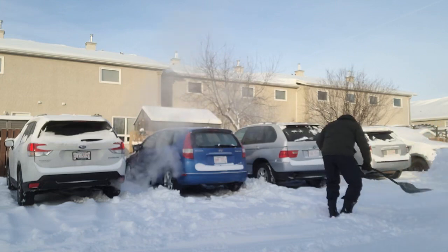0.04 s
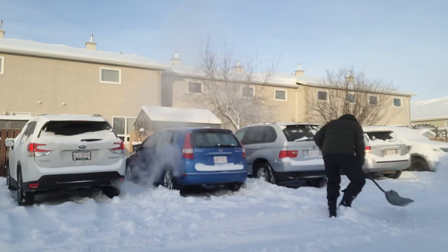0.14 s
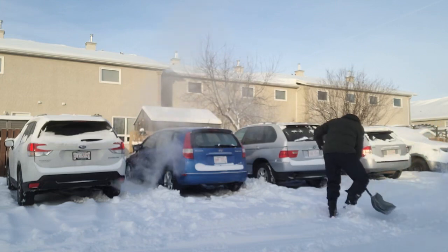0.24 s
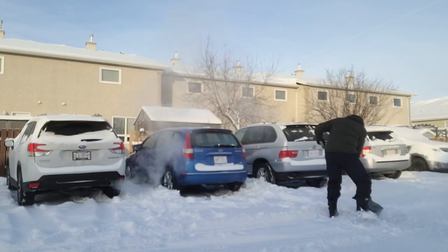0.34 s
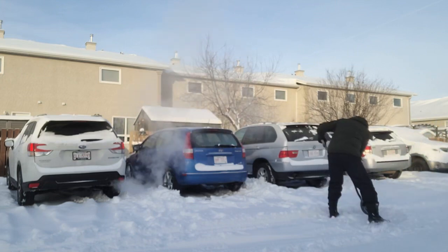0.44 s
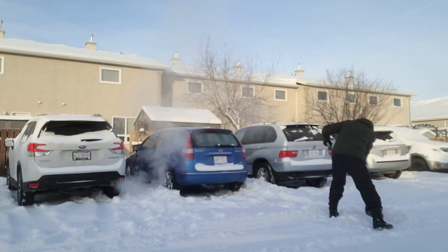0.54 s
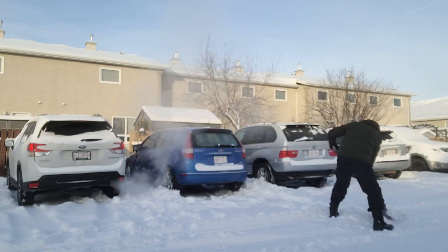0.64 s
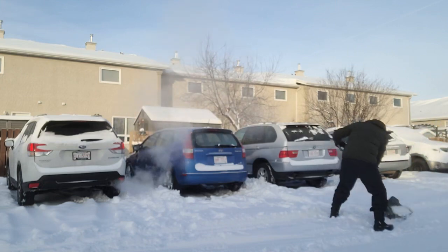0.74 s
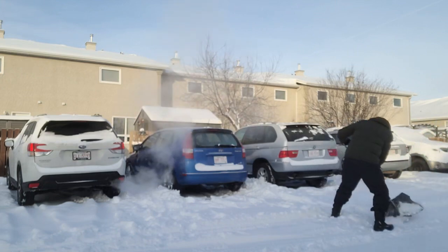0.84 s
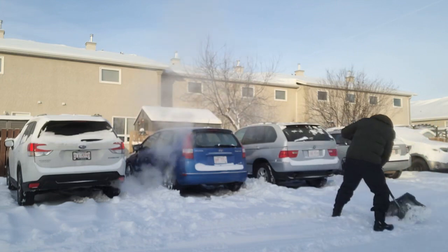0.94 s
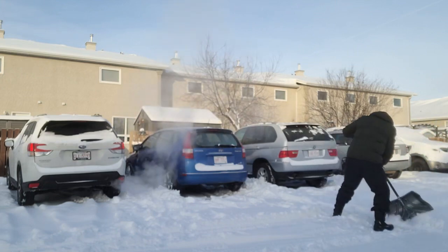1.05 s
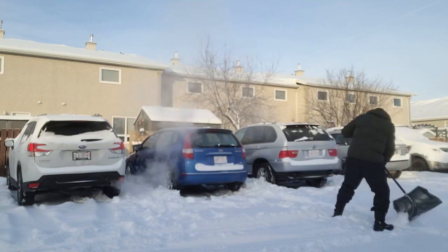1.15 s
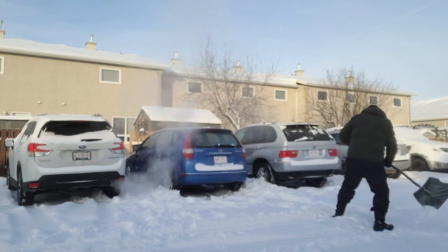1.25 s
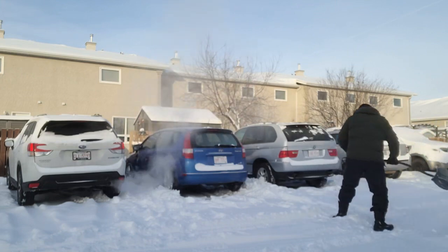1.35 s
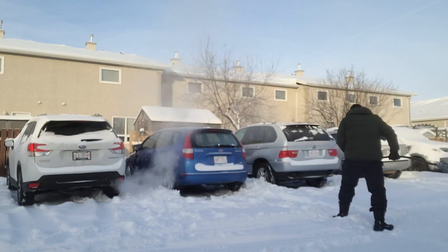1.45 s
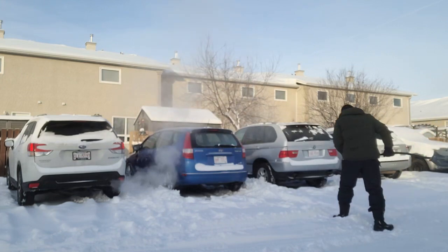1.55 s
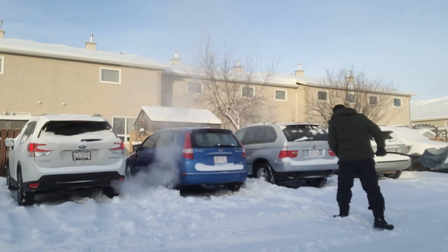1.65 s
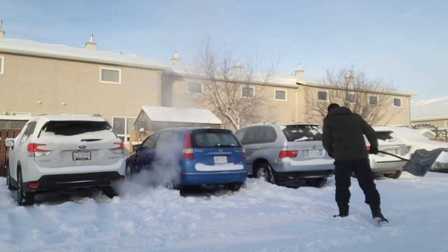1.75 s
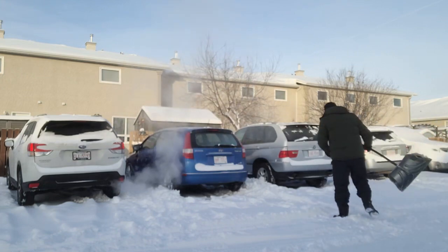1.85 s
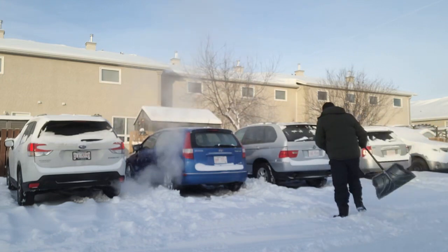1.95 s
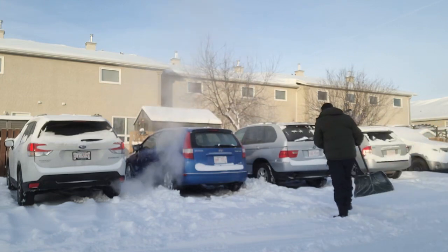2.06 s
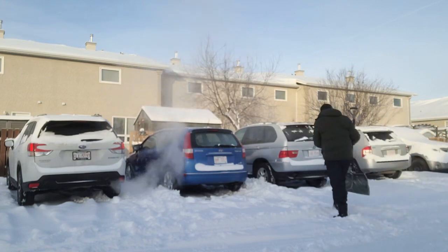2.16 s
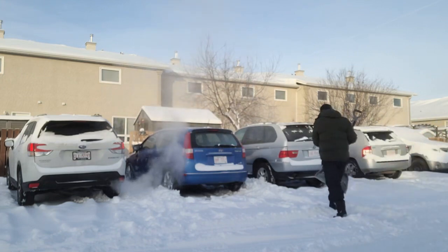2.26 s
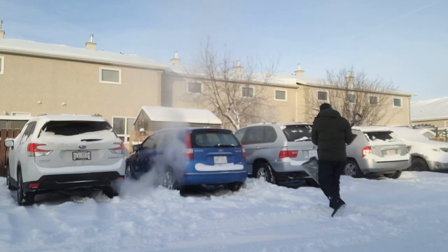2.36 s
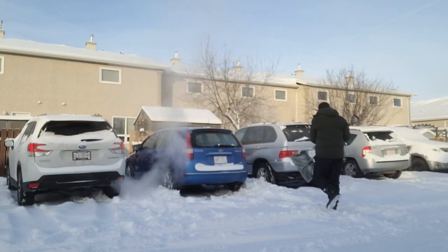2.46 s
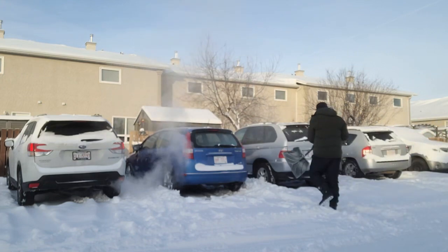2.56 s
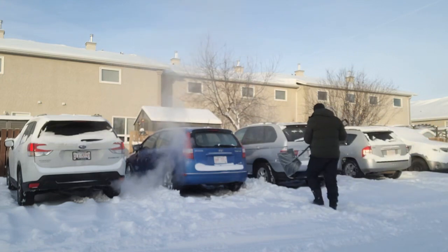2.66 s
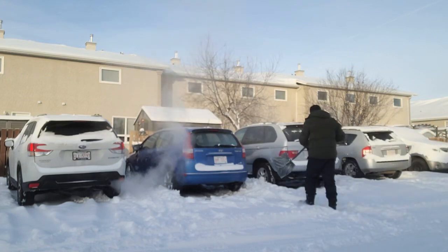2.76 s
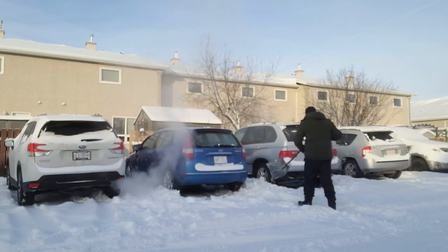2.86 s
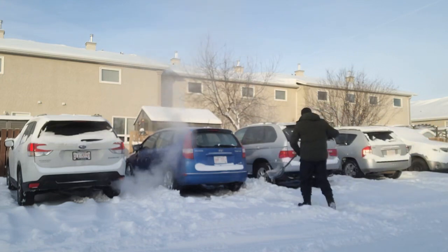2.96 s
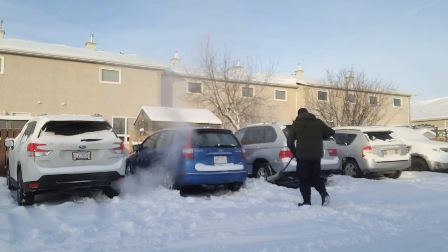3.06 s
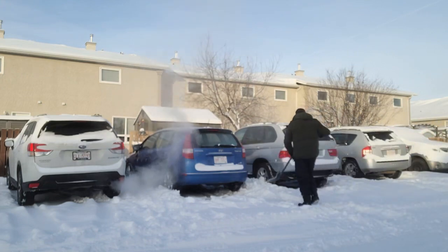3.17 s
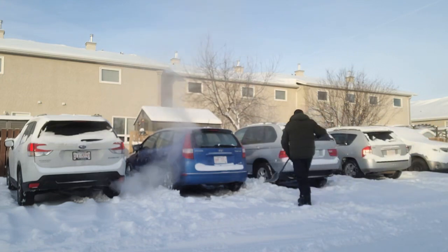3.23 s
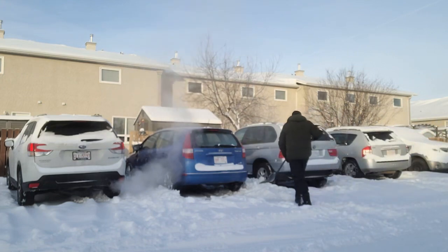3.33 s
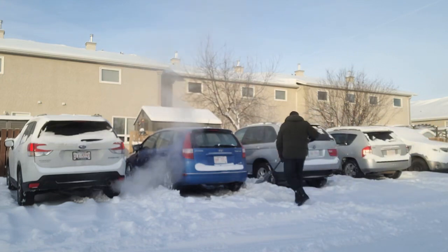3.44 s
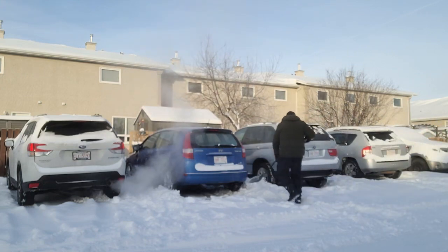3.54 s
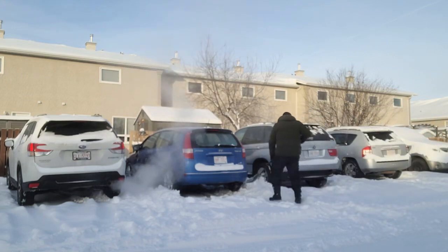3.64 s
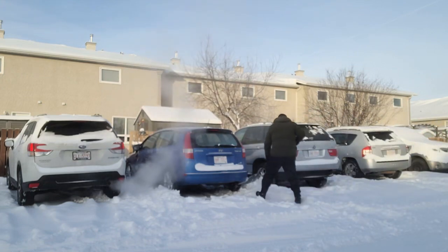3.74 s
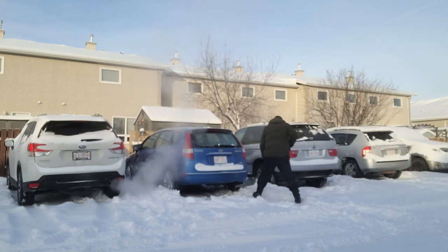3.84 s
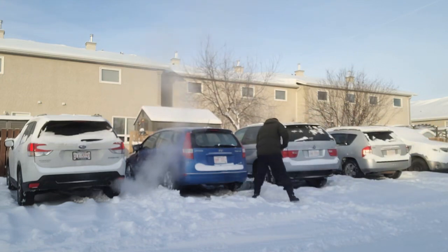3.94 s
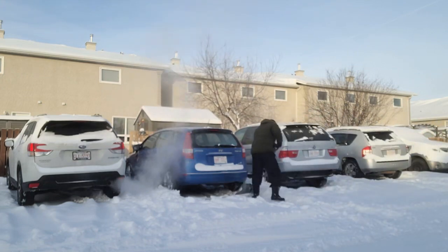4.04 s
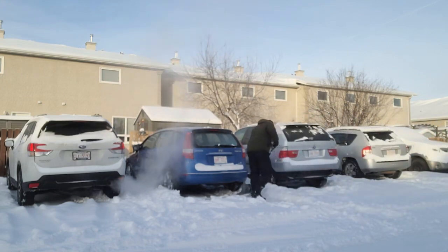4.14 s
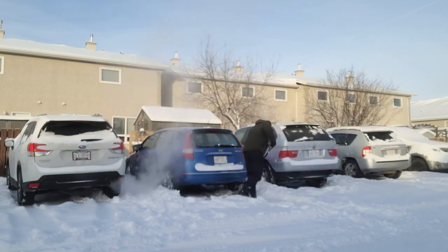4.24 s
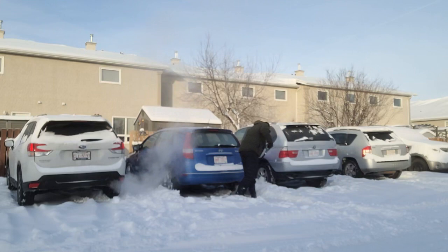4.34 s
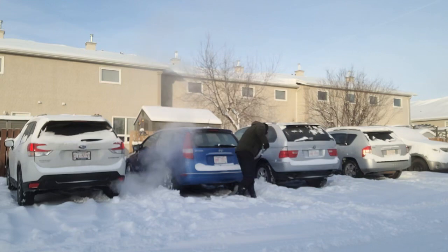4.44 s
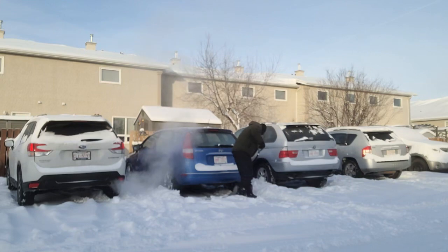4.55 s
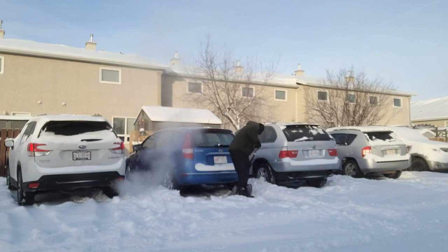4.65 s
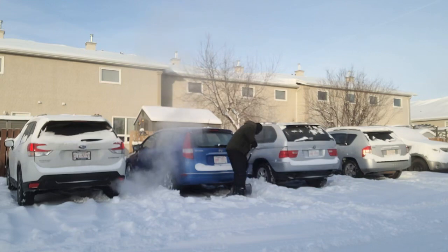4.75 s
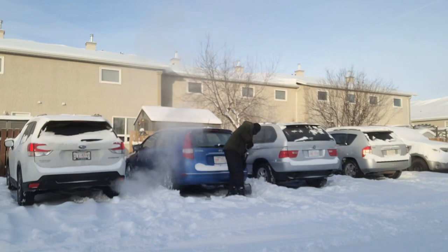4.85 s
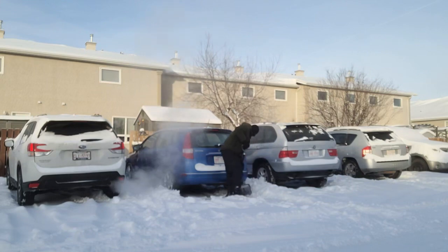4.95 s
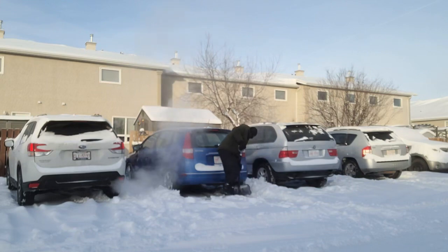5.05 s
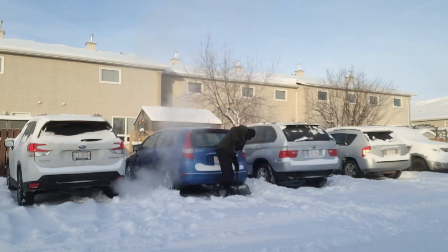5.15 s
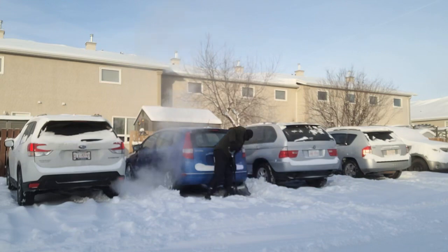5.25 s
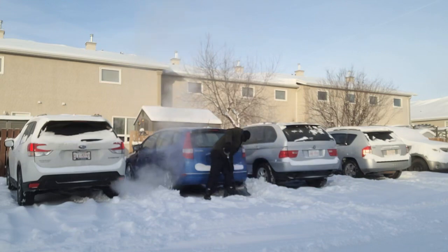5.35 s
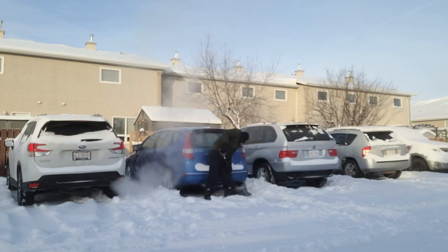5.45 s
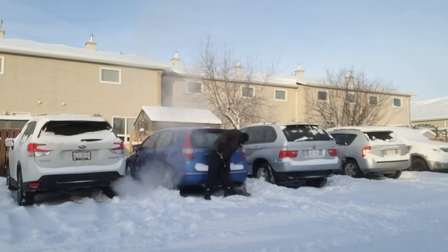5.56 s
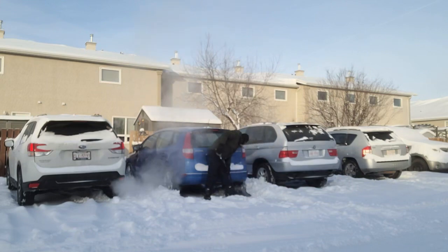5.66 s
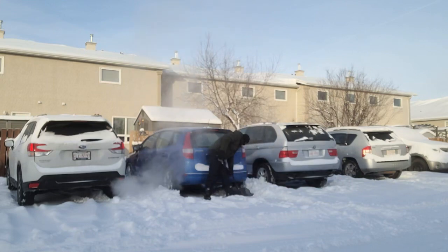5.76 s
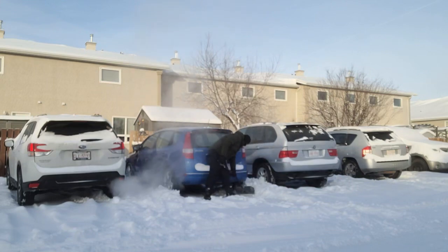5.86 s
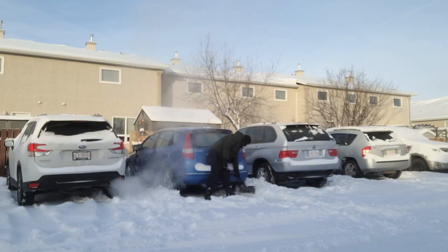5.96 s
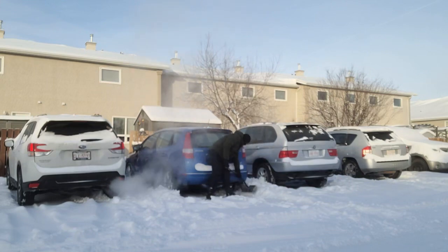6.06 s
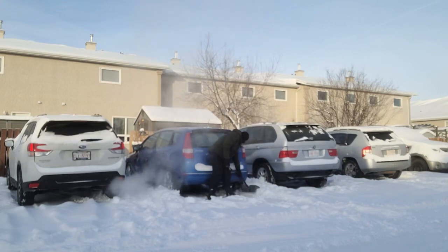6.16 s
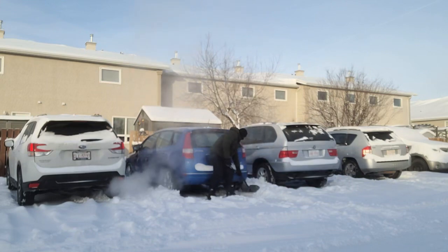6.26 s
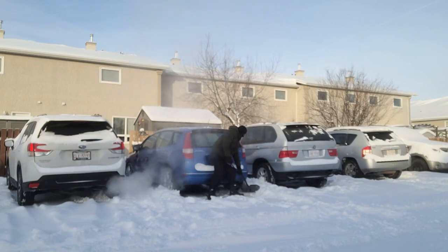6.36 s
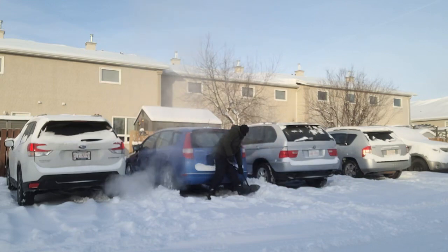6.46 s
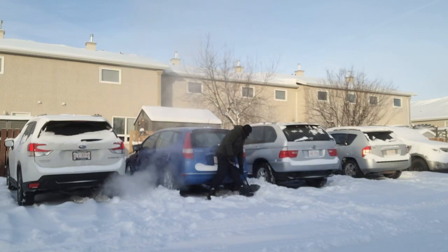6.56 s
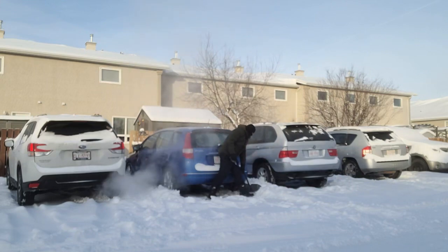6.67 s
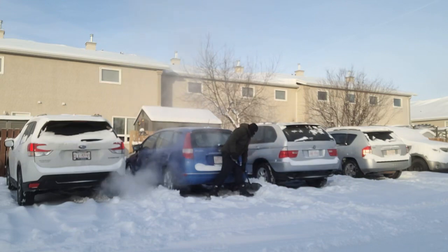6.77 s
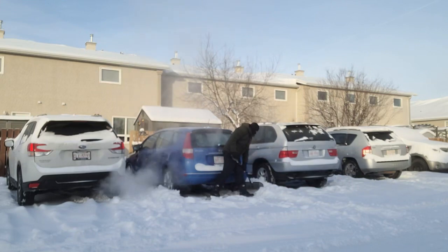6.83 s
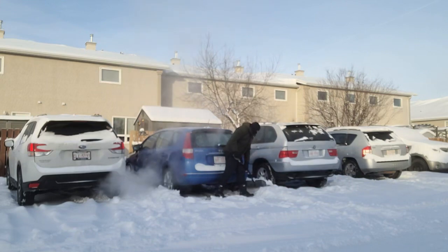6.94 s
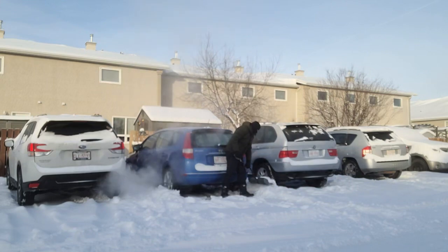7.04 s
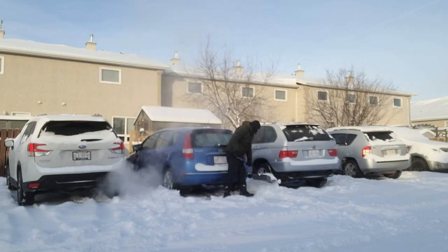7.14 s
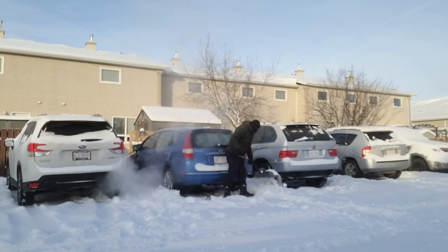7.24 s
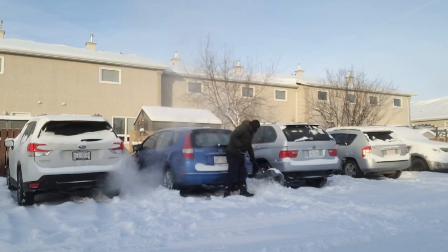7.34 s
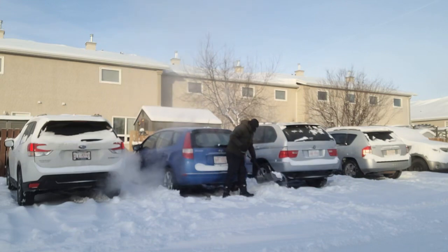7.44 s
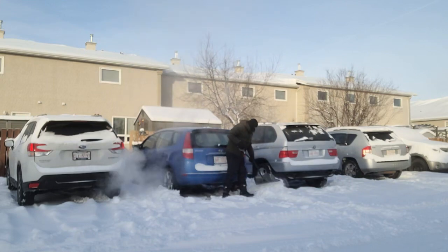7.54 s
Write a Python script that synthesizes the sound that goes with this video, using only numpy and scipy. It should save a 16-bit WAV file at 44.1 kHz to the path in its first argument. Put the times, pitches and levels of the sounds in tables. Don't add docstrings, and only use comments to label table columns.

```python
import sys
import numpy as np
from scipy import signal
from scipy.fft import rfft, irfft, next_fast_len
from scipy.io import wavfile
from scipy.ndimage import uniform_filter1d, map_coordinates

SR = 44100
rng = np.random.default_rng(int(sys.argv[2]) if len(sys.argv) > 2 else 0)


def gain_from_db(level_db):
    decades = np.asarray(level_db, float) / 20
    return 10 ** decades


def waveform_to_disk(signal):
    frames = np.transpose(np.atleast_2d(signal))
    scaled = np.clip(frames, -1, 1) * 32767
    samples = np.round(scaled).astype(np.int16)
    wavfile.write(sys.argv[1], SR, samples)


N = 335160

# (frequency [Hz], likeness [0 to 1])
SNOW_LIKENESS = [(130, .99), (300, .97), (700, .75), (2000, .72), (5000, .6), (15000, .3)]
# (frequency [Hz], left minus right [dB])
SNOW_TILT = [(60, -6), (180, -1), (550, -1), (1650, 2), (4970, 7), (15000, 9)]
# (time [s], lead [samples])
LEFT_LEAD = [
    (0, 9),
    (2, 9),
    (4, 1),
    (7.6, 1),
]


def shovel():
    near = friction() + singing() + thuds()
    echo = gain_from_db(-15) * yard(near)
    left, right = ports(near + echo, SNOW_LIKENESS, SNOW_TILT)
    lead = np.round(curves(LEFT_LEAD)[0]).astype(int)
    return np.array([left, right[np.maximum(np.arange(N) - lead, 0)]])


# (frequency [Hz], level per Hz [dB])
CRACKLE_TONE = [(1500, -18), (2600, -0.5), (3000, -1), (4400, -0.5), (6200, -1.5), (7600, 4), (8600, -15),
                (9500, -10.5)]
# (frequency [Hz], width [Hz], level [dB])
EDGE_MODES = [(2750, 250, -15), (3550, 44, 14.5), (3940, 1900, -0.5), (5210, 420, 12), (5780, 1200, 0),
              (7380, 38, -1)]
# (frequency [Hz], level per Hz [dB])
SHARD_TONE = [(300, -32), (700, 16), (1200, -14), (5000, 10), (8000, -2), (9000, -18), (12000, -20),
              (16000, -12)]
# (frequency [Hz], level per Hz [dB])
POWDER_TONE = [(6500, -29), (8200, -7.5), (9000, -10), (10500, -3), (12300, -0.5), (14000, -2), (15900, 3),
               (17000, 0)]
# (frequency [Hz], width [Hz], level [dB])
RASP_MODES = [(900, 114, 0), (1148, 104, 0.5), (1364, 110, 3), (1710, 500, 3.5), (2240, 1000, -1)]
# (frequency [Hz], width [Hz], level [dB])
EARLY_BOOM_MODES = [(181, 119, -6.5), (291, 66, -2.5), (412, 49, -8.5), (573, 84, -12.5), (712, 100, -17)]
# (frequency [Hz], width [Hz], level [dB])
LATE_BOOM_MODES = [(145, 29, -7), (250, 22, -3.5), (352, 55, -11.5), (439, 100, -14.5), (682, 72, -17.5)]


def friction():
    sliding, fine, scraping, load = motion()
    spray, crack, puff = breaks()
    spray = gain_from_db(-10) * spray

    stutter = gain_from_db(.8 * np.tanh(wobble(30)))
    clumps = gain_from_db(2.2 * np.tanh(wobble(250)))
    grains = stutter * clumps * patchy(patchy_db=1.5)

    crunch = shaped(grains, lambda hz: tone(CRACKLE_TONE)(hz) * (1 + resonances(EDGE_MODES)(hz)))
    crunch = crunch * (sliding + .5 * spray)
    shards = shaped(rng.standard_normal((2, N)), tone(SHARD_TONE))
    shards = gain_from_db(-2) * (spray + gain_from_db(-9.5) * crack) * shards
    powder = shaped(grains, tone(POWDER_TONE)) * (gain_from_db(5) * fine + gain_from_db(-10) * puff)
    rasp = shaped(grains, resonances(RASP_MODES)) * (scraping + gain_from_db(.5) * crack)

    push = stutter * gain_from_db(1.5 * np.tanh(wobble(45))) * rng.standard_normal((2, N))
    late = np.clip(np.arange(N) / SR - 3.5, 0, 1)
    early_boom = shaped(push, resonances(EARLY_BOOM_MODES))
    late_boom = shaped(push, resonances(LATE_BOOM_MODES))
    boom = (1 - late) * early_boom + late * late_boom
    return crunch + powder + rasp + shards + load * boom


# (time [s], sliding of the edge [dB], load on the blade over sliding [dB])
DEEP_STROKES = [
    [(0.59, -74, 12), (0.608, -66, 19), (0.626, -47.5, 11.5), (0.652, -42.5, 6.5), (0.67, -42, 5.5),
     (0.772, -43, 11), (0.956, -41, 7.5), (1.06, -47.5, 0.5)],
    [(1.06, -47, -3), (1.084, -45.5, -3.5), (1.112, -40.5, -4.5), (1.156, -41, 2.5), (1.182, -38, 5.5),
     (1.222, -72, -3), (1.25, -66, 12)],
    [(5.65, -71, 3), (5.664, -61, 9), (5.684, -44, -8), (5.716, -39.5, 1), (5.744, -59, 18),
     (5.75, -50, -6)],
    [(5.75, -48, 2), (5.786, -39.5, -5), (5.82, -40.5, 4.5), (5.896, -38.5, -1), (5.942, -46.5, -1.5),
     (5.954, -54, -5), (5.996, -51.5, -5), (6.13, -77.5, 1)],
]
# (time [s], sliding of the edge [dB], load on the blade over sliding [dB])
LIGHT_DRAGS = [
    [(4.86, -77, -6), (4.93, -60, -5), (4.96, -60.5, -6), (5.05, -50, -10), (5.14, -54.5, -6),
     (5.188, -51, -10), (5.23, -57, -6)],
    [(5.23, -54.5, -4), (5.264, -59.5, -6), (5.276, -53.5, -3), (5.378, -56.5, -4), (5.494, -51, -9),
     (5.556, -61.5, -2), (5.638, -66.5, -12), (5.65, -58, -6)],
]
# (fine powder thrown [dB], rasp in the blade [dB])
STROKE_TINTS = [
    (-5.5, -7),
    (-4.5, -1),
    (-8, -2.5),
    (-0.5, -2),
    (-5, 1.5),
    (-5.5, -0.5),
]
# (time of peak [s], rise [s], fall [s], level [dB], fineness [dB])
BOOT_TREADS = [(0, 0.0085, 0.0085, -53, -14.5), (.5, 0.75, 0.74, -66, 9), (1.33, 0.24, 0.21, -55, -1.5),
               (1.845, 0.06, .1, -79, 16), (2.12, 0.5, 0.49, -69, 4), (2.52, 0.17, 0.16, -61.5, 1.5),
               (2.655, 0.035, 0.035, -55, -3), (3.19, 0.19, 0.098, -56.5, 1), (3.34, 0.083, .2, -69, -1),
               (3.94, 0.082, 0.24, -61, -9), (4.16, 0.032, 0.14, -63, -4), (4.22, 0.069, 0.098, -62.5, 0),
               (4.28, .05, 0.06, -69, -3), (4.36, 0.037, .07, -58, 0), (4.395, 0.055, 0.095, -63.5, -2),
               (4.47, .03, 0.071, -69, 5), (4.52, 0.082, 0.055, -60.5, -3), (4.61, 0.12, .12, -61.5, 0),
               (4.96, 0.026, 0.11, -71, 9), (5.18, 0.063, .05, -66, 8), (5.435, 0.037, 0.058, -68, 10),
               (6.33, 1, 0.21, -68.5, 2), (1.489, 0.025, 0.039, -77, -30), (6.64, 0.37, 0.28, -60.5, 3.5),
               (6.831, 0.0084, 0.04, -56.5, -7), (6.9, 0.053, 0.33, -64, 2),
               (7.497, 0.033, 0.12, -52.5, -1), (7.6, 0.15, .1, -64.5, 6)]
# (time of peak [s], rise [s], fall [s], level [dB])
SNOW_SLUMPS = [(.06, 0.047, 0.034, -49), (.57, 0.11, .1, -49.5), (1.385, 0.03, 0.1, -48),
               (1.52, .08, .15, -68), (1.69, 0.18, 0.093, -47), (2.152, 0.39, 0.49, -53),
               (2.76, 0.043, .05, -60), (2.95, 0.07, 0.046, -48), (3.36, 0.12, 0.21, -53.5),
               (3.84, .08, 0.16, -50), (4.02, 0.15, 0.023, -47.5), (4.16, .08, 0.11, -53),
               (4.9, 0.055, 0.23, -52), (6.34, 0.22, 0.085, -70), (6.58, 0.039, 0.1, -60),
               (6.836, 0.018, 0.04, -47), (7.15, 0.097, .1, -70), (7.5, .06, 0.18, -58)]


def motion():
    gains = np.zeros((4, N))
    t = np.arange(N) / SR
    for rows, (powder_db, rasp_db) in zip(DEEP_STROKES + LIGHT_DRAGS, STROKE_TINTS):
        slide_db, load_db = curves(rows)
        during = (t >= rows[0][0]) & (t < rows[-1][0])
        extra_db = np.array([0 * t, powder_db + 0 * t, rasp_db + .67 * load_db, load_db - 2])
        gains += during * gain_from_db(slide_db + extra_db)
    for *shape, fine_db in BOOT_TREADS:
        gains[:3] += swell(*shape) * gain_from_db([[0], [fine_db - 3.5], [-2 - fine_db]])
    settling = gain_from_db(-65.5 + 5.5 * wobble(15))
    gains[3] += sum(swell(*row) for row in SNOW_SLUMPS) + settling
    return uniform_filter1d(gains, size=200)


def swell(s, rise, fall, db):
    t = np.arange(N) / SR - s
    slope_db = 22
    return gain_from_db(db - slope_db * np.where(t < 0, -t / rise, t / fall))


# (time [s], peak level [dB], dull part [dB])
CRUST_BREAKS = [
    (0.6155, -48, -16),
    (1.463, -33, -5.5),
    (2.6409, -45, -27),
    (4.143, -37.5, -15),
    (4.6094, -56, -13),
    (5.678, -31, -9),
    (5.7089, -33, -18),
    (6.819, -34.5, -2),
    (6.826, -29.5, -24),
    (7.4855, -44, -12),
]
# (time [s], peak level [dB], dull part [dB], powder [dB])
CRYSTAL_SNAPS = [(0.32, -52, -14, 10), (0.3475, -43, -20, -2), (0.362, -44, -19, 11),
                 (0.4234, -48, -13, -2), (0.4903, -46, -14, 0), (1.471, -40, 7, 0), (1.624, -44, -6, 3),
                 (1.732, -47, 0, -5), (1.8286, -52, -20, 6), (1.8454, -54, -15, 7), (1.9709, -52, -15, 7),
                 (2.0168, -46, -14, 5), (2.0383, -45, -19, 5), (2.0955, -53, -12, 3),
                 (2.1265, -45.5, 2, -3), (2.155, -44, -15, -6), (2.2954, -50, 2, 4), (2.3624, -56, -15, 6),
                 (3.1805, -39, -19, -8), (3.193, -44, -14, -8), (3.3094, -54, -6, -3),
                 (3.6549, -60, -15, 3), (4.1145, -40, -14, -3), (4.2017, -49, -15, 3),
                 (4.3499, -46, -15, 9), (4.626, -56, -15, 3), (4.9562, -49, -15, -3), (4.968, -38, -17, 7),
                 (4.9991, -39, -15, -3), (5.1533, -45, -18, -3), (5.274, -44, -15, -3),
                 (5.3822, -42, -15, -3), (5.4206, -38, -15, -3), (5.461, -41, -20, -1),
                 (6.19, -39, -14, -11), (6.8285, -38, -12, -3), (7.427, -49, -11, -3)]


def breaks():
    t = np.arange(SR // 4) / SR
    out = np.zeros((3, N + SR))
    slabs = [(*row, 0, .041) for row in CRUST_BREAKS]
    crystals = [(*row, .019) for row in CRYSTAL_SNAPS]
    for s, db, dull_db, fine_db, t60 in slabs + crystals:
        burst = gain_from_db(db - 60 * t / t60) * (1 - np.exp(-11 * t / t60))
        out[:, round(s * SR):][:, :len(t)] += burst * gain_from_db([[0], [dull_db], [fine_db]])
    return out[:, :N]


# (time [s], length [s], pitch [Hz], level [dB])
BLADE_GROANS = [(0.34, 0.12, 416, -55.5), (.62, 0.064, 275, -37), (.67, 0.067, 290, -38),
                (0.736, .045, 293, -35), (.785, 0.032, 286, -33), (.825, 0.083, 286, -37.5),
                (0.88, 0.051, 300, -35.5), (0.938, 0.051, 295, -40), (1.059, 0.054, 300, -47.5),
                (.68, 0.098, 550, -44.5), (.625, .05, 541, -49), (0.76, 0.069, 200, -41),
                (.8, 0.043, 440, -41), (.79, 0.047, 570, -44), (0.866, 0.076, 670, -44),
                (.88, 0.054, 470, -40.5), (0.93, 0.068, 401, -37), (1.144, 0.038, 420, -39.5),
                (1.15, 0.049, 585, -41.5), (1.152, 0.054, 1000, -50.5), (3.917, 0.025, 1200, -61),
                (3.935, 0.05, 1040, -57), (3.965, 0.043, 618, -64), (1.515, 0.086, 930, -62.5),
                (1.653, 0.05, 744, -59), (5.798, 0.037, 267, -47), (5.845, 0.03, 243, -34),
                (5.875, 0.041, 250, -37.5), (5.901, .025, 370, -46), (5.815, .02, 660, -47),
                (5.847, 0.031, 660, -43), (5.7, .02, 294, -47), (6.815, 0.037, 710, -55),
                (6.883, 0.049, 270, -52.5), (7.013, 0.063, 331, -53.5), (7.128, 0.061, 231, -52),
                (6.832, 0.017, 595, -48), (5.5, 0.15, 330, -58.5), (3.43, .09, 615, -62),
                (2.06, 0.11, 410, -59.5)]
# (time [s], length [s], pitch [Hz], level [dB])
BLADE_SONGS = [(0.63, 0.076, 2250, -45), (0.732, 0.02, 2270, -40), (0.75, 0.14, 2327, -42),
               (0.72, 0.06, 1950, -42), (0.65, 0.048, 3250, -48), (0.851, 0.059, 3550, -47),
               (0.823, 0.034, 4150, -50), (0.866, 0.026, 4760, -56), (0.914, 0.053, 5430, -45),
               (0.935, 0.056, 3250, -46), (1, 0.06, 4650, -51), (0.92, 0.064, 2070, -45.5),
               (.73, .03, 1373, -46), (1.07, .06, 3680, -51), (1.093, 0.076, 5380, -53),
               (1.132, 0.036, 3140, -44), (1.1, 0.081, 1956, -46.5), (1.169, 0.026, 2260, -35.5),
               (1.165, 0.043, 3670, -49), (1.463, 0.023, 3000, -49.5), (1.465, .03, 1940, -56),
               (2.636, 0.031, 7180, -66), (3.142, .06, 5130, -64), (3.168, 0.066, 6800, -61),
               (4.498, 0.034, 2100, -66), (4.56, .05, 2300, -68), (5.073, 0.035, 1660, -64),
               (5.09, .02, 5500, -59), (5.07, 0.037, 6800, -62), (5.224, 0.12, 2300, -61),
               (5.27, 0.071, 5200, -59), (5.413, 0.12, 5200, -60), (5.462, 0.059, 1730, -58.5),
               (5.488, 0.032, 2870, -61), (5.598, 0.018, 1780, -63), (5.698, 0.026, 2200, -48),
               (5.809, 0.037, 1600, -50), (5.851, 0.025, 1960, -44), (5.88, 0.031, 1563, -43),
               (6.819, 0.028, 1188, -49), (3.925, 0.042, 1750, -64), (3.962, 0.054, 2350, -66),
               (3.97, .04, 4800, -67), (6.818, .016, 2100, -57), (5.83, 0.0406, 1500, -47),
               (8.1, .015, 1350, -59), (7.486, .03, 4600, -59), (5.17, .03, 7200, -62),
               (5.42, .04, 1620, -63)]


def singing():
    out = np.zeros((2, N + SR))
    for s, length, hz, db in BLADE_GROANS + BLADE_SONGS:
        t = np.arange(round(length * SR)) / SR
        hold_s, steady = (.002, .35) if hz > 900 else (6 / hz + .0002, .7)
        hold = round(hold_s * SR)
        noise = rng.standard_normal((2, 2, SR // 4))
        smooth = uniform_filter1d(uniform_filter1d(noise, size=hold), size=hold)
        a, b = smooth[..., 2000:2000 + len(t)]
        drift = a + 1j * b
        note = np.real(drift / np.abs(drift) ** steady * np.exp(2j * np.pi * hz * t))
        fade = np.sqrt(np.sin(np.pi * t / length))
        start = round(s * SR)
        out[:, start:start + len(t)] += gain_from_db(db + 2.5) * fade * unit(note)
    return out[:, :N]


# (time [s], peak level [dB], pitch [Hz])
SOFT_THUDS = [(0.053, -42.5, 267), (0.262, -40.5, 250), (1.312, -39, 295), (1.342, -32.5, 298),
              (1.372, -39.5, 326), (1.642, -44, 184), (1.675, -47, 370), (1.7, -48, 287), (1.759, -49, 210),
              (2.093, -34.5, 172), (2.139, -40, 269), (2.173, -40, 250), (2.307, -40.5, 295),
              (2.831, -40.5, 273), (2.939, -41, 244), (3.319, -45.5, 245), (3.819, -42.5, 259),
              (3.995, -69, 180), (6.819, -37.5, 190), (6.831, -32, 219), (6.937, -44, 234),
              (7.051, -53, 291)]


def thuds():
    out = np.zeros(N + SR)
    t = np.arange(SR // 6) / SR
    for s, db, hz in SOFT_THUDS:
        shape = gain_from_db(db + 4.5 - 60 * t / .061) * (1 - np.exp(-t / .0024))
        wave = np.sin(2 * np.pi * hz * t) + .35 * np.sin(2 * np.pi * 1.445 * hz * t)
        out[round(s * SR):][:len(t)] += shape * wave
    return out[:N] * [[1.4], [.1]]


# (time [s], peak level [dB], pitch [Hz], left minus right [dB])
ICE_TICKS = [(0.2488, -50, 10500, 10), (0.2628, -50, 6500, 3), (0.3479, -44, 6800, 2.5),
             (0.3635, -44, 11900, 7), (1.4494, -49, 6300, 5), (1.4714, -36.5, 9000, 11),
             (1.479, -40, 8000, 8), (1.7322, -46, 4000, 7), (1.8429, -49, 10900, 7),
             (1.9724, -52, 10000, 3), (2.0187, -48, 11200, 9), (2.0397, -47, 12500, 12),
             (2.0797, -53, 9700, 7), (2.127, -50, 5500, 6), (2.1568, -50, 7200, 9),
             (4.115, -36.5, 5700, -2), (5.4621, -35, 10900, 6), (5.7095, -30, 9000, 7),
             (5.862, -28, 5000, 6), (5.9, -29, 11000, 8), (6.1914, -48, 5200, 2), (6.1998, -51, 7300, 9),
             (6.8206, -35, 4900, 2), (6.8284, -35.5, 8500, 12), (7.491, -50, 8500, 7)]


def ticks():
    out = np.zeros((2, N + SR))
    t = np.arange(SR // 100) / SR
    for s, db, hz, pan_db in ICE_TICKS:
        wave = np.sin(2 * np.pi * hz * t)
        wave = wave + .35 * np.sin(2 * np.pi * 1.28 * hz * t)
        wave = wave + .52 * np.sin(2 * np.pi * .71 * hz * t)
        click = np.exp(-t / (.0003 + .24 / hz)) * wave
        start = round(s * SR)
        out[:, start:start + len(t)] += gain_from_db(db + pan_db * np.array([[.5], [-.5]])) * click
    return out[:, :N]


# (frequency [Hz], time to fall 60 dB [s])
YARD_FALL = [(200, 0.19), (2000, 0.23), (10000, 0.17)]


def yard(x):
    hz, t, z = signal.stft(rng.standard_normal((2, SR // 2)), SR, nperseg=256)
    fall = gain_from_db(-60 * t / along(YARD_FALL, hz)[:, None])
    tail = signal.istft(z * fall, SR, nperseg=256)[1]
    delayed = np.pad(x, ((0, 0), (700, 0)))
    return signal.fftconvolve(delayed, tail / np.linalg.norm(tail[0]), axes=1)[:, :N]


# (time [s], firings a second [Hz])
FIRING_RATE = [(0, 58.84), (2.2, 58.84), (3.6, 58.76), (5.3, 58.7), (6.5, 58.74), (7.6, 58.55)]
# (multiple of firing rate, level [dB], phase [rad], left lead [rad])
HUM_ORDERS = [(1, -38.9, 0, .28), (2, -39.9, 2.2, .126)]
# (multiple of firing rate, level [dB], phase [rad], left lead [rad])
WHINE_ORDERS = [(3.963, -60, 3.5, 0.58), (8.97, -64, -0.5, 1.1), (11.93, -70, 2, 1.7), (14.9, -74, 0, 1.95),
                (17.01, -71.5, 0.06, 1.88), (20.25, -75.5, 0, 2), (28, -76, 1.3, 2),
                (29.9, -71.5, 2.5, 2.02)]
# (frequency [Hz], level per Hz [dB])
RUMBLE_TONE = [(20, -43), (33, 1), (48, 5), (75, 6.5), (100, 2.5), (140, -14), (190, -6), (300, -45)]
# (frequency [Hz], level per Hz [dB])
AIR_TONE = [(82, -29.5), (140, -12), (185, -28.5), (280, -18), (468, -28), (528, -28), (769, -32),
            (1770, -35.5), (2700, -39.5), (3500, -45), (4850, -43), (7200, -48), (8440, -61.5),
            (11600, -52.5), (15900, -53)]
# (frequency [Hz], likeness [0 to 1])
AIR_LIKENESS = [(60, .99), (130, .99), (290, .88), (640, .42), (1400, 0), (15000, 0)]
# (frequency [Hz], left minus right [dB])
AIR_TILT = [(60, 2.5), (180, -2), (550, -0.5), (1650, -0.5), (4970, 1), (15000, 3.5)]


def engine():
    turn = 2 * np.pi * np.cumsum(curves(FIRING_RATE)[0]) / SR - 1.9
    side = np.array([[.5], [-.5]])

    def order(k, db, phase, lead, loose_db):
        level = gain_from_db(db + 3 + loose_db * wobble(11))
        return level * np.cos(k * turn + phase + lead * side + loose_db * .22 * wobble(11))

    hum = sum(order(*row, loose_db=.4) for row in HUM_ORDERS) * gain_from_db([[-1.1], [.9]])
    whine = sum(order(*row, loose_db=2.5) for row in WHINE_ORDERS)
    puff = 1 + .1 * np.cos(turn + .3)
    noise = puff * patchy(patchy_db=1.5)
    rumble = gain_from_db(-52) * shaped(noise, tone(RUMBLE_TONE))
    air = gain_from_db(-52.5 + .074 * wobble(3.14)) * shaped(noise, tone(AIR_TONE))
    return hum + whine + ports(rumble + air, AIR_LIKENESS, AIR_TILT)


def ports(pair, alike, pan):
    def mix(hz):
        angle = np.arccos(np.clip(along(alike, hz), -1, 1)) / 2
        return np.array([np.cos(angle), np.sin(angle)])

    mid, side = filtered(pair, mix)
    both = np.array([mid + side, mid - side])
    return filtered(both, lambda hz: gain_from_db(along(pan, hz) * np.array([[.5], [-.5]])))


def patchy(patchy_db):
    z = signal.stft(rng.standard_normal((2, N)), nperseg=512)[2]
    field = uniform_filter1d(rng.standard_normal(z.shape[1:]), size=3, axis=0)
    field = uniform_filter1d(field, size=9, axis=1)
    return signal.istft(z * gain_from_db(patchy_db * unit(field)), nperseg=512)[1][:, :N]


def resonances(modes):
    def response(f):
        total = 0
        for k, (centre, width, db) in enumerate(modes):
            ring = 1j * f * width / (centre * centre - f * f + 1j * f * width)
            total = total + (-1) ** k * gain_from_db(db) * ring
        return total
    return response


def tone(points):
    return lambda hz: gain_from_db(along(points, hz))


def shaped(x, response):
    return unit(filtered(x, response))


def filtered(x, response):
    m = next_fast_len(N + SR // 2)
    return irfft(rfft(x, m) * response(np.fft.rfftfreq(m, 1 / SR)), m)[..., :N]


def wobble(rate):
    knots = rng.standard_normal(int(N * rate / SR) + 4)
    return map_coordinates(knots, [np.arange(N) * rate / SR])


def curves(rows):
    s, *cols = np.transpose(rows)
    return [np.interp(np.arange(N) / SR, s, c) for c in cols]


def along(points, hz):
    f, v = np.transpose(points)
    return np.interp(np.log(hz + 1), np.log(f + 1), v)


def unit(x):
    return x / np.sqrt(np.mean(x ** 2) + 1e-20)


def scene():
    return shovel() + ticks() + engine()


def low_pass(x):
    return signal.sosfilt(signal.butter(12, 15750, fs=SR, output="sos"), x)


def record(dry):
    mix = filtered(dry, lambda hz: hz < 15750) - .0003
    return low_pass(mix)


dry = scene()
out = record(dry)
waveform_to_disk(out)
```